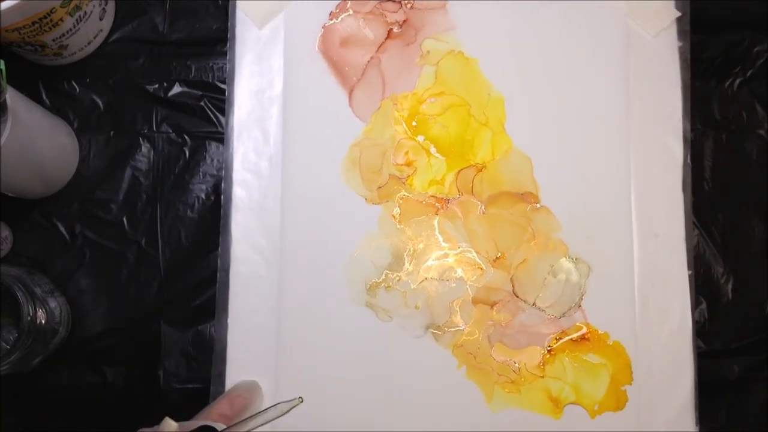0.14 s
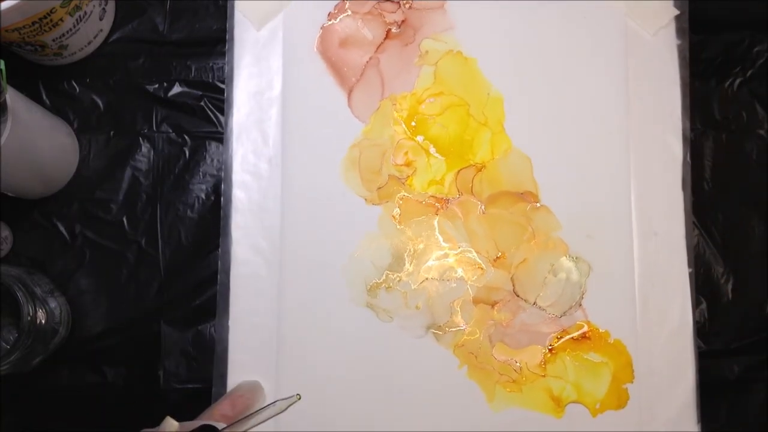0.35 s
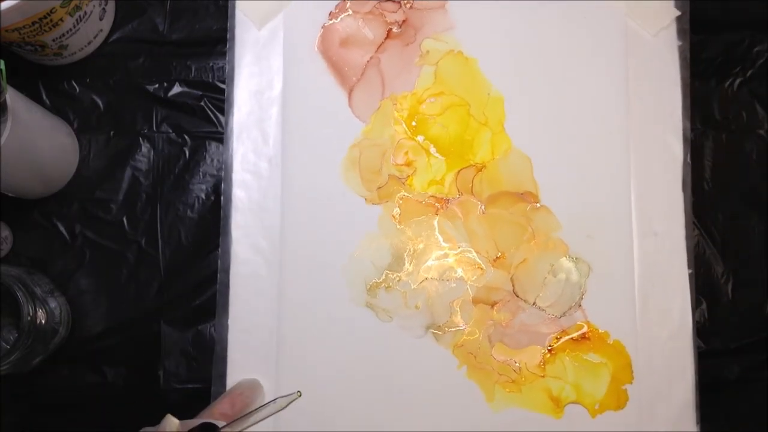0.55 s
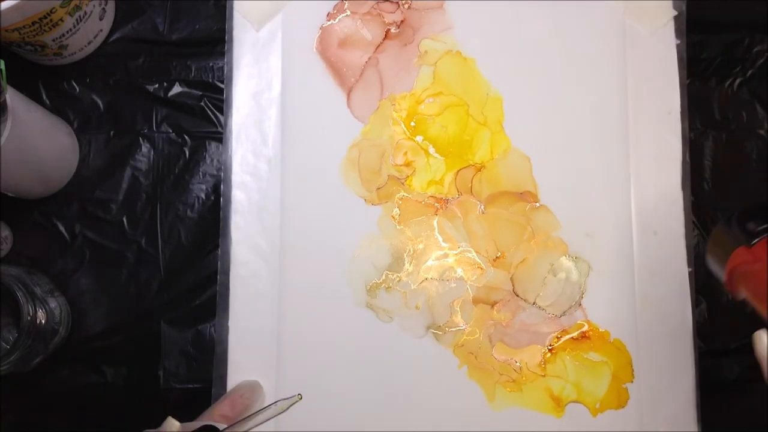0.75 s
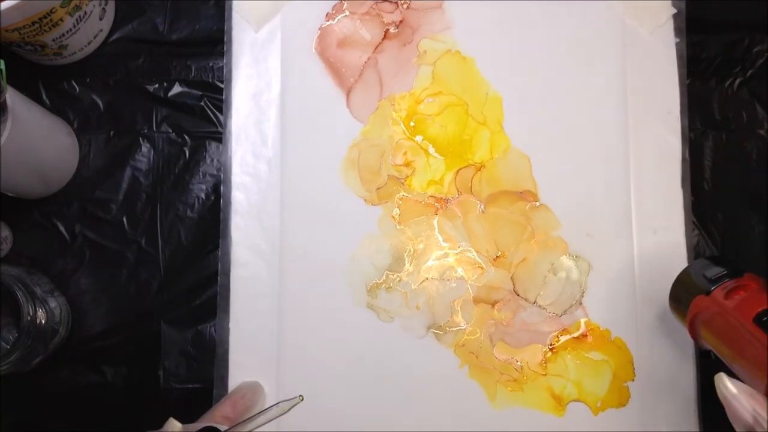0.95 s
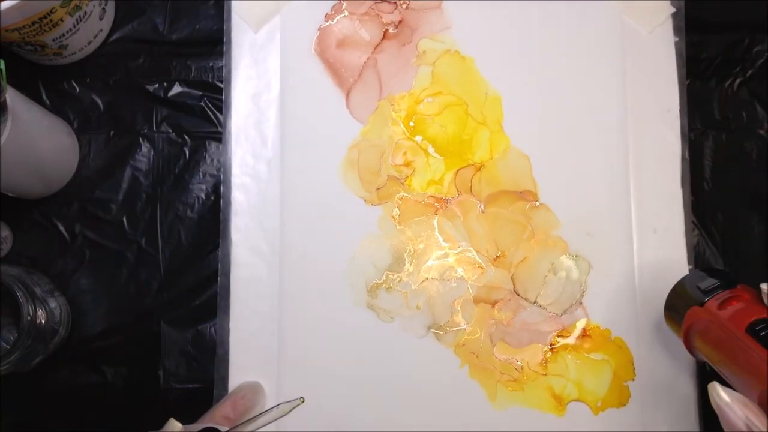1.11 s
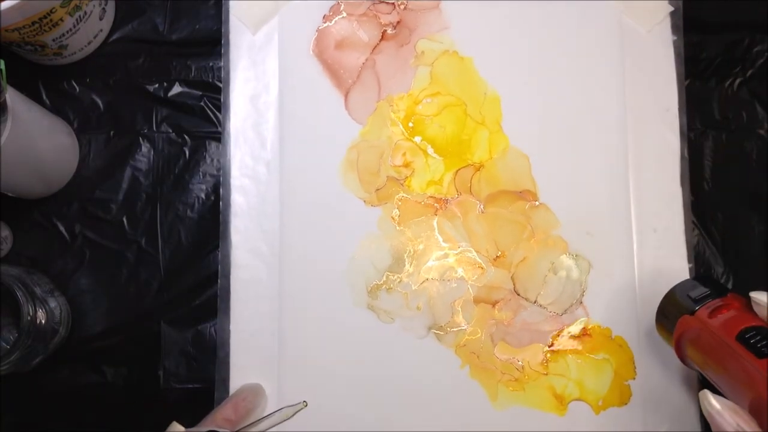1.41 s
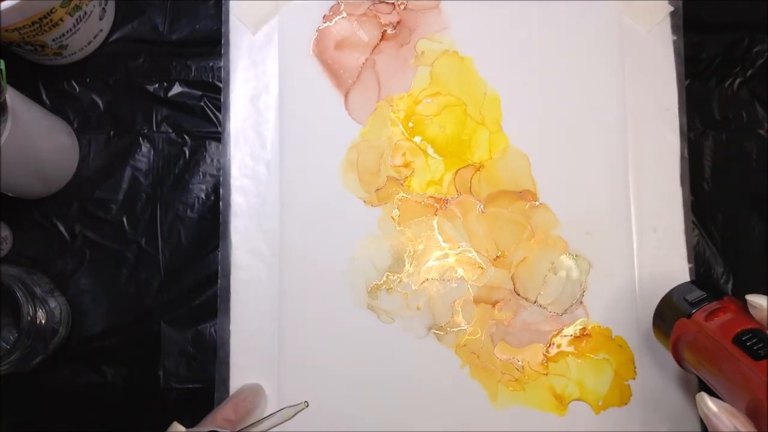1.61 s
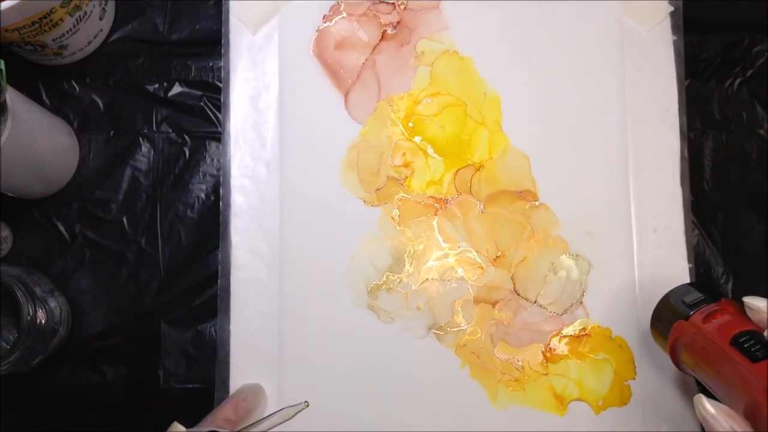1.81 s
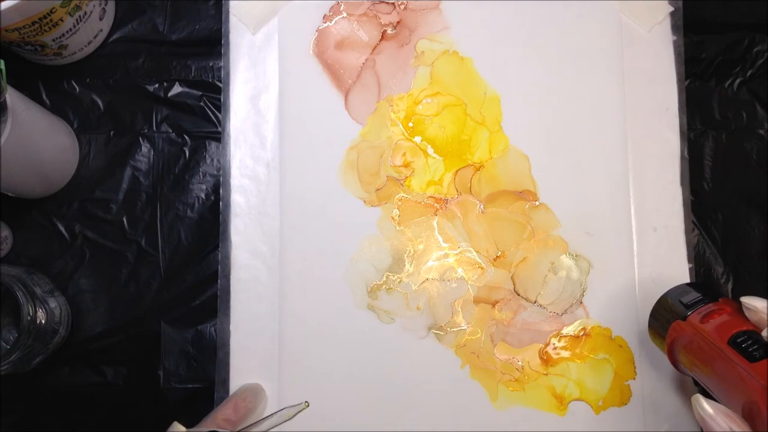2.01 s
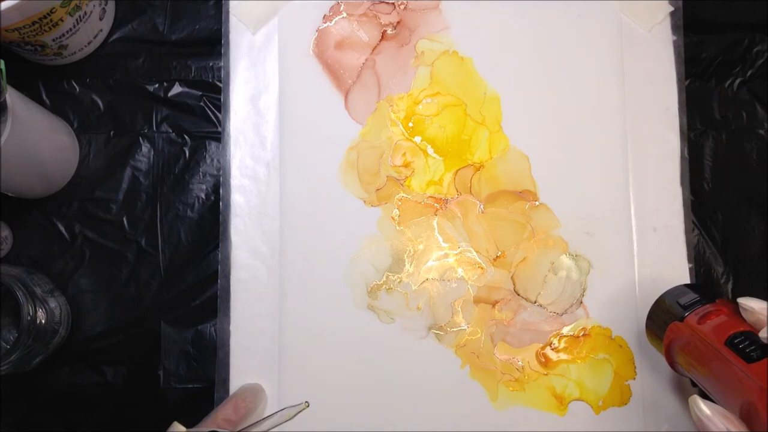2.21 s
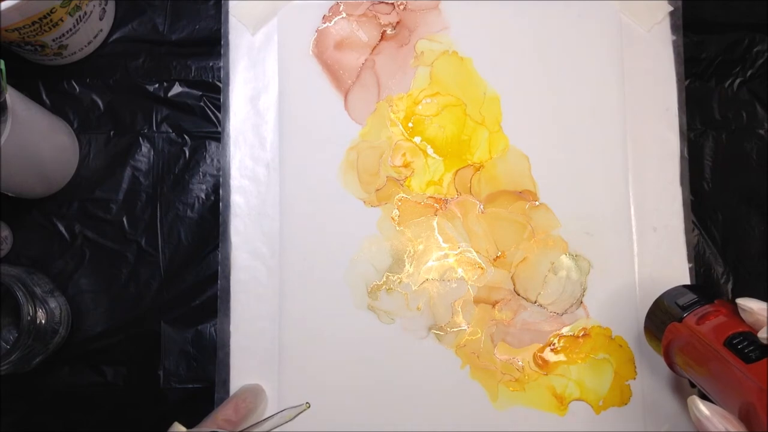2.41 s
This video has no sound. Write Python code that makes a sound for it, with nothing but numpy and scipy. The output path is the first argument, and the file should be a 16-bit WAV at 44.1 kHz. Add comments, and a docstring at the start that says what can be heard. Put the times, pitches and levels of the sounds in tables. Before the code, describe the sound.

A small blow dryer runs steadily, hissing and whining, its tone shifting as it swings round

```python
"""A steady rush of air and a whine are heard first: a small blow dryer, held aside.
It soon swings round to aim at a sheet on a table; its colour shifts, and the level dips briefly a few times.
The rush is shaped noise, the ringing housing is noise in resonances, and the fan motor is
a set of sine tones on multiples of its turning rate. Both ears hear the same."""
import sys
import numpy as np
from scipy import signal
from scipy.fft import rfft, irfft
from scipy.io import wavfile
from scipy.ndimage import uniform_filter1d

SR = 44100
rng = np.random.default_rng(int(sys.argv[2]) if len(sys.argv) > 2 else 0)


def output_pcm(signal):
    """Save a mono or channel-first signal as 16-bit PCM at the path in sys.argv[1].

    Samples are clipped to [-1, 1] before scaling.
    """
    pcm = np.clip(np.atleast_2d(signal).T, -1, 1) * 32767
    wavfile.write(sys.argv[1], SR, np.round(pcm).astype(np.int16))


N = 112454  # length in samples
T = np.arange(N) / SR  # time in seconds

AIM_S, AIM_TAKES_S = 0.76, 0.52  # middle and length of the swing towards the sheet
TURBULENCE_DB, TURBULENCE_PER_S = 0.84, 3.7  # each band's own flicker: spread and speed
SURGE_DB, SURGE_PER_S = 0.31, 30  # unsteadiness of the whole flow: spread and speed
CUTOFF_HZ = 15700  # the treble ends just above this


def from_db(db):
    """Turn decibels into a gain."""
    return 10 ** (np.asarray(db) / 20)


def rms_one(x):
    """Scale a signal to an rms (average strength) of 1."""
    return x / np.sqrt(np.mean(x ** 2) + 1e-30)


def filtered(x, gain_at):
    """Change the strength of each frequency by the gain that gain_at gives for it."""
    hz = np.arange(N // 2 + 1) * SR / N
    return irfft(rfft(x) * gain_at(np.maximum(hz, 1)), N)


def drift(rate, size=2048):
    """Make a slow random curve with a spread of 1; a higher rate moves faster."""
    hz = np.arange(size // 2 + 1) * SR / N
    slow = irfft(rfft(rng.standard_normal(size)) / (1 + (hz / rate) ** 2))
    return np.interp(np.arange(N) * size / N, np.arange(size), rms_one(slow))


def flicker():
    """Turbulence makes the strength of one band of air noise waver."""
    return from_db(TURBULENCE_DB * drift(TURBULENCE_PER_S))


def swell(s, half):
    """Rise smoothly to 1 at time s, and fall again."""
    return np.exp(-0.5 * ((T - s) / half) ** 2)


def by_aim(aside_db, aimed_db):
    """Blend the power from the level held aside to the level aimed as the dryer swings."""
    swing = np.clip((T - AIM_S) / AIM_TAKES_S, -0.5, 0.5)
    aim = 0.5 + 0.5 * np.sin(np.pi * swing)  # 0 is aside, 1 is aimed
    aside_power = (1 - aim) * from_db(aside_db) ** 2
    aimed_power = aim * from_db(aimed_db) ** 2
    return np.sqrt(aside_power + aimed_power)


def band_noise(hz, width_hz):
    """Air noise in one steep-sided resonance, with an rms of 1."""
    def resonance(f):
        return 1 / np.sqrt(1 + ((f * f - hz * hz) / (f * width_hz)) ** 4)

    return rms_one(filtered(rng.standard_normal(N), resonance))


def ringing(rows):
    """Air sets off several resonances, each following the aim and flickering on its own."""
    total = 0
    for hz, width, aside, aimed in rows:
        total = total + by_aim(aside, aimed) * flicker() * band_noise(hz, width)
    return total


# The broad rush of the jet, before it flickers.
# Each row: frequency in Hz, level in dB per Hz held aside, level in dB per Hz aimed.
RUSH_SPECTRUM = [(30, -130, -128), (91.5, -120, -112), (156, -109, -107), (209, -92, -96), (392, -81, -82),
                 (590, -85.5, -88.5), (1100, -75.5, -78.5), (1990, -76, -77.5), (3000, -71, -73),
                 (3350, -73, -79.5), (4450, -78.5, -77.5), (6770, -75, -76), (9100, -79, -76.5),
                 (12600, -75, -74.5), (15600, -79, -76)]


def rush():
    """The turbulent jet makes broad noise; its colour follows the aim and each octave flickers."""
    hz, aside_db, aimed_db = np.transpose(RUSH_SPECTRUM)
    jet = 0
    for levels, gain in ((aside_db, by_aim(0, -np.inf)), (aimed_db, by_aim(-np.inf, 0))):
        def colour(f):
            return np.sqrt(SR / 2) * from_db(np.interp(np.log(f), np.log(hz), levels))

        jet = jet + gain * filtered(rng.standard_normal(N), colour)
    octaves = 20 * 2.0 ** np.arange(10)  # lower edges in Hz
    return sum(flicker() * filtered(jet, lambda f: (f >= low) & (f < 2 * low)) for low in octaves)


# Air resonances of barrel and grille, before they flicker.
# Each row: frequency in Hz, width in Hz, level in dB held aside, level in dB aimed.
BARREL_RESONANCES = [(486.6, 102, -67, -55.5), (796, 46, -57, -59), (987, 116, -58, -54),
                     (1295, 243, -47, -46), (1742, 120, -49.5, -62), (2244, 90, -67, -48),
                     (4100, 530, -69, -47.5), (5246, 370, -61, -49), (5930, 1000, -47.5, -62),
                     (7720, 720, -67, -46.5), (10070, 1200, -56, -44.5), (11440, 730, -45.5, -58),
                     (14400, 1700, -46.5, -48)]
# Narrow whistles of the housing.
# Each row: frequency in Hz, width in Hz, level in dB held aside, level in dB aimed.
HOUSING_WHISTLES = [(274, 26, -72, -67.5), (1712, 11, -54, -56)]
# The nozzle's howl, a cluster of close resonances, before it sinks in the turn.
# Each row: frequency in Hz, width in Hz, level in dB held aside, level in dB aimed.
NOZZLE_HOWL = [(2479, 170, -43, -39.5), (2590, 71, -44, -48), (2694, 157, -38.5, -40),
               (2795, 88, -49, -43.5)]
# The howl sinks while the nozzle turns: middle, half length, depth
SHADE_S, SHADE_HALF_S, SHADE_DB = 0.79, 0.16, 5.5


def housing():
    """Rushing air rings in barrel, grille and nozzle; the nozzle's howl sinks during the turn."""
    howl_gain = from_db(-SHADE_DB * swell(SHADE_S, SHADE_HALF_S))
    return ringing(BARREL_RESONANCES + HOUSING_WHISTLES) + howl_gain * ringing(NOZZLE_HOWL)


# Tones of the motor whine, before they flutter.
# Each row: multiple of the turning rate, level in dB held aside, level in dB aimed.
MOTOR_TONES = [(1, -55, -66), (2, -63, -62), (4, -58.5, -66), (5, -44, -48), (7, -53, -58), (10, -53, -55),
               (11, -52, -62), (13, -61, -79), (14, -58.5, -57), (15, -54.5, -60)]
# How fast the motor turns, before its small random wander.
# Each row: time in seconds, turns per second (Hz).
TURNING_RATE = [(0, 496.2), (.42, 496.3), (.56, 497.4), (.8, 497.2), (1.2, 496.6), (2.55, 496.4)]
MOTOR_WANDER, WANDER_PER_S = 0.0005, 5.5  # wander as a share of the turning rate, and its speed
WHINE_FLUTTER_DB, FLUTTER_PER_S = 1.2, 7  # spread and speed of each tone's flutter


def motor():
    """The fan whines on multiples of its turning rate, strongest at five blades a turn."""
    steady_hz = np.interp(T, *np.transpose(TURNING_RATE))
    turning_hz = steady_hz * (1 + MOTOR_WANDER * drift(WANDER_PER_S))
    phase = 2 * np.pi * np.cumsum(turning_hz) / SR
    whine = 0
    for multiple, aside, aimed in MOTOR_TONES:
        flutter = from_db(WHINE_FLUTTER_DB * drift(FLUTTER_PER_S))  # from the airflow
        tone = np.sin(round(multiple) * phase + rng.uniform(0, 2 * np.pi))
        whine = whine + by_aim(aside, aimed) * flutter * tone
    return np.sqrt(2) * whine  # a sine needs this peak for an rms of 1


# Resonances, and a low rumble, that flare as the nozzle swings past.
# Each row: time of the peak in seconds, half length in seconds, frequency at the peak in Hz,
# glide in Hz per second, width in Hz, level at the peak in dB.
SWING_FLARES = [(.65, .1, 3150, 1300, 550, -40), (.88, .1, 3900, 2500, 800, -46),
                (.45, .05, 3980, 0, 140, -49), (.58, .12, 1260, 0, 110, -44.5),
                (.665, .055, 2750, 700, 70, -35.5), (.81, .07, 2860, 400, 90, -46),
                (.59, .08, 7470, 0, 60, -44.5), (.52, .06, 11550, 0, 200, -47),
                (.42, .12, 12050, 1500, 350, -49), (.85, .12, 13950, 2000, 500, -49),
                (.82, .08, 10000, 0, 900, -49), (.6, .12, 112, -170, 25, -79)]


def flares():
    """As the nozzle swings past, bands of air noise swell, and some glide in pitch."""
    total = 0
    for s, half, hz, glide, width, db in SWING_FLARES:
        shift = np.exp(1j * np.pi * glide * (T - s) ** 2)  # moves every frequency alike
        gliding = np.real(signal.hilbert(band_noise(hz, width)) * shift)
        total = total + from_db(db) * swell(s, half) * gliding
    return total


LISTEN_S = 0.012  # the strongest tones are picked over about this stretch
COMPARE_HZ, COMPARE_SHARE = 2620, 0.75  # how wide, and how fully, they are judged against neighbours
KEPT_FROM_HZ = 1100  # the bass always drops out
KEPT_WIDTH_HZ, KEPT_APART_HZ, KEPT_DB = 55, 260, 4.5  # half width, least spacing and boost


def strongest_tones(x, s, count):
    """Keep narrow bands around the frequencies that stand out most at one moment."""
    spectrum = np.abs(rfft(x * swell(s, LISTEN_S)))
    neighbours = uniform_filter1d(spectrum, int(COMPARE_HZ * N / SR))
    standing = spectrum / neighbours ** COMPARE_SHARE
    peaks, _ = signal.find_peaks(standing[:int(CUTOFF_HZ * N / SR)], distance=KEPT_APART_HZ * N / SR)
    peaks = peaks[peaks * SR / N > KEPT_FROM_HZ]
    kept_hz = peaks[np.argsort(standing[peaks])[-count:]] * SR / N
    return filtered(x, lambda f: sum(1 / (1 + ((f - hz) / KEPT_WIDTH_HZ) ** 4) for hz in kept_hz))


# Moments when the level dips briefly.
# Each row: middle in seconds, half length in seconds, depth in dB before the kept tones are added.
BRIEF_DIPS = [(.473, .017, 28), (.719, .007, 16), (1.146, .007, 16), (1.444, .008, 16), (1.806, .007, 16),
              (2.538, .013, 22)]
DIP_STEEPNESS = 3  # higher gives sharper edges


def dipped(x):
    """In each brief dip the sound drops away and mainly its strongest tones are left."""
    for s, half, depth_db in BRIEF_DIPS:
        gain = from_db(-depth_db * np.exp(-np.abs((T - s) / half) ** DIP_STEEPNESS))
        kept = from_db(KEPT_DB) * strongest_tones(x, s, count=17)
        x = gain * x + (1 - gain) * kept
    return x


def scene():
    """The air noises surge together, the motor whines beside them, alike in both ears."""
    surge = from_db(SURGE_DB * drift(SURGE_PER_S))
    air = rush() + housing() + flares()
    dryer = air * surge + motor()
    return np.array([dryer, dryer])


def record(dry):
    """One channel for both ears; the level dips briefly and the top is cut steeply."""
    def top_cut(f):
        return from_db(-np.clip((f - CUTOFF_HZ) / 4, 0, 90))  # 1 dB more every 4 Hz, up to 90 dB

    mono = filtered(dipped(dry.mean(axis=0)), top_cut)
    return np.array([mono, mono])


dry = scene()
out = record(dry)
output_pcm(out)
```